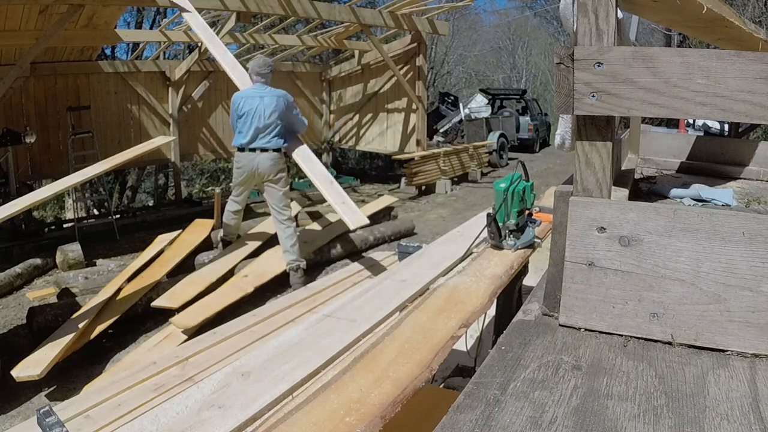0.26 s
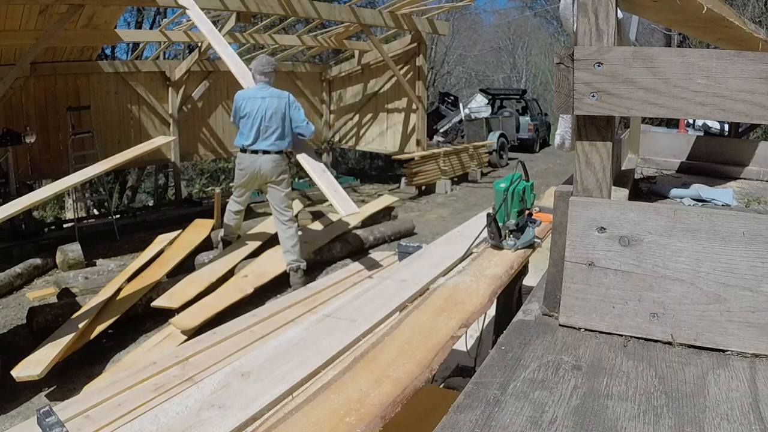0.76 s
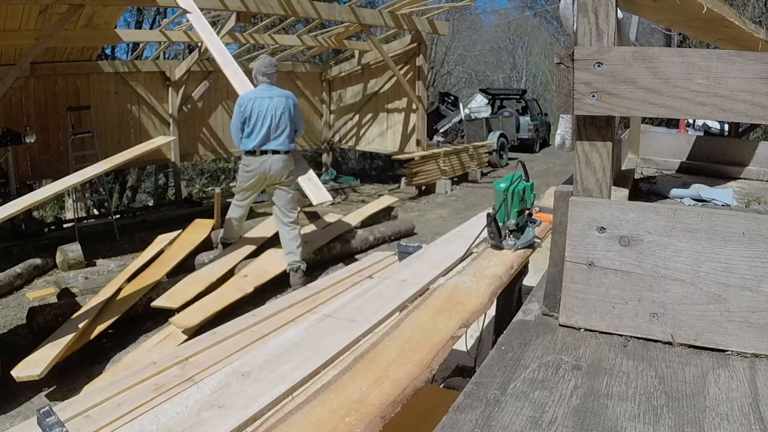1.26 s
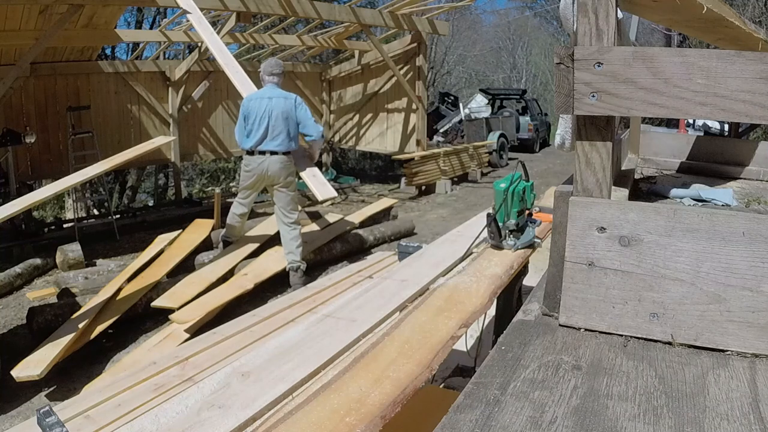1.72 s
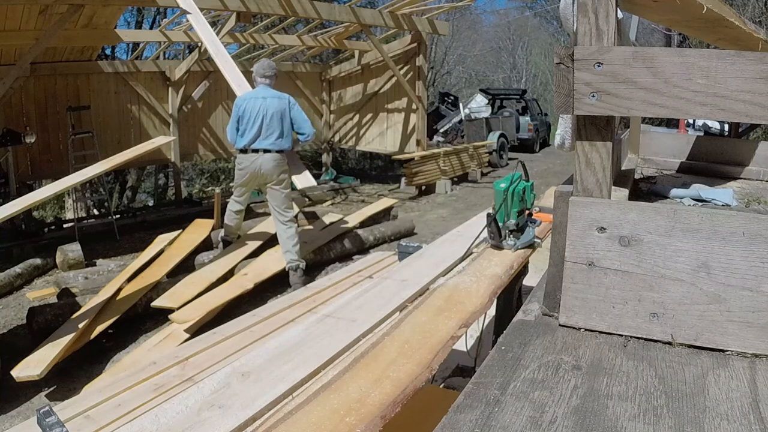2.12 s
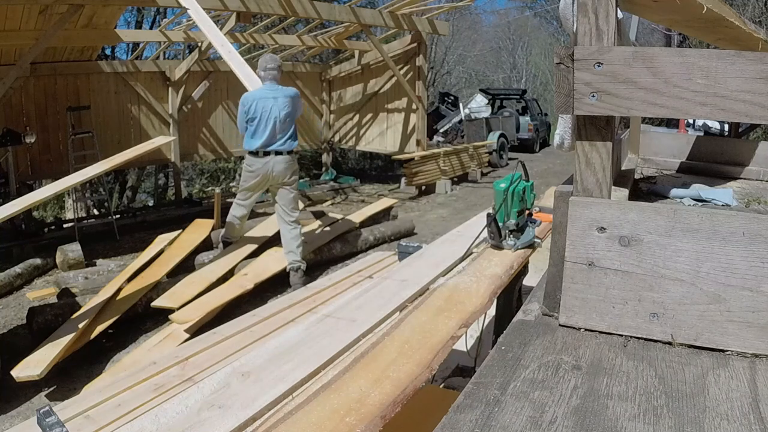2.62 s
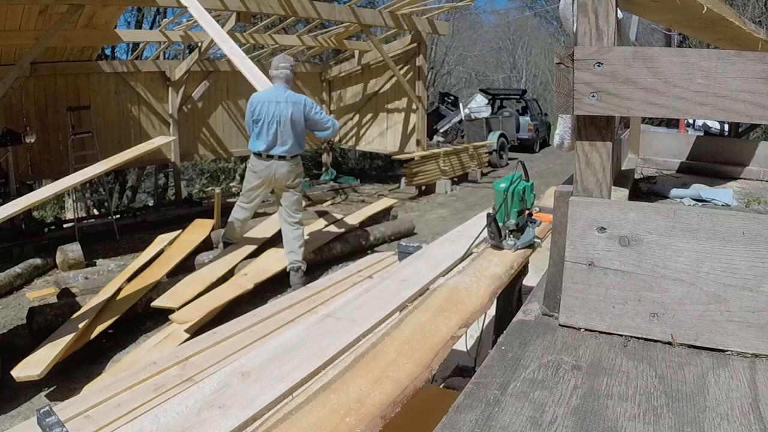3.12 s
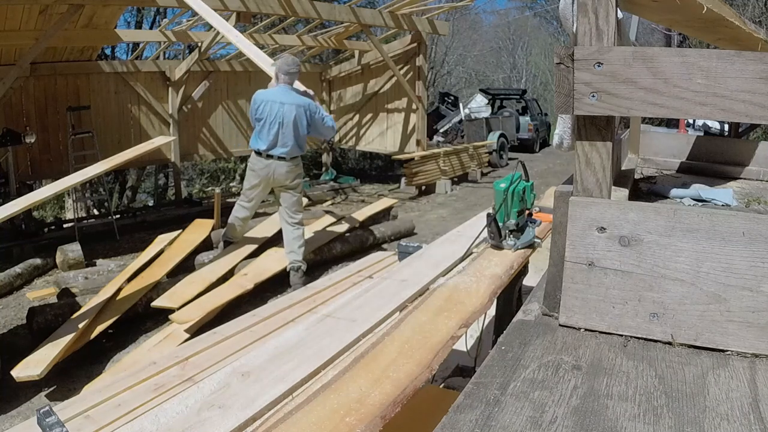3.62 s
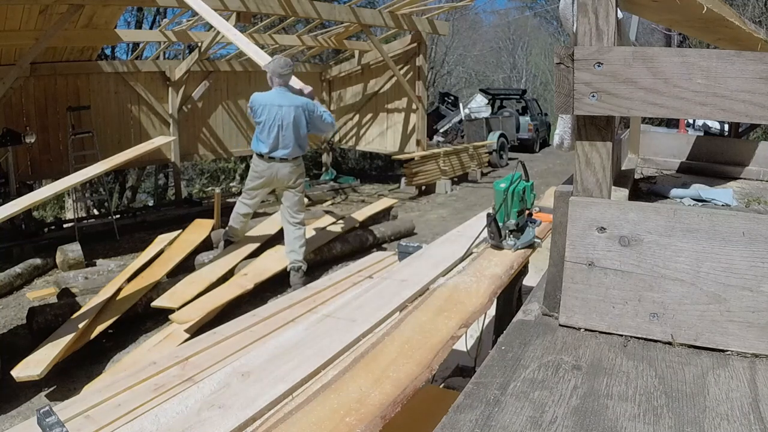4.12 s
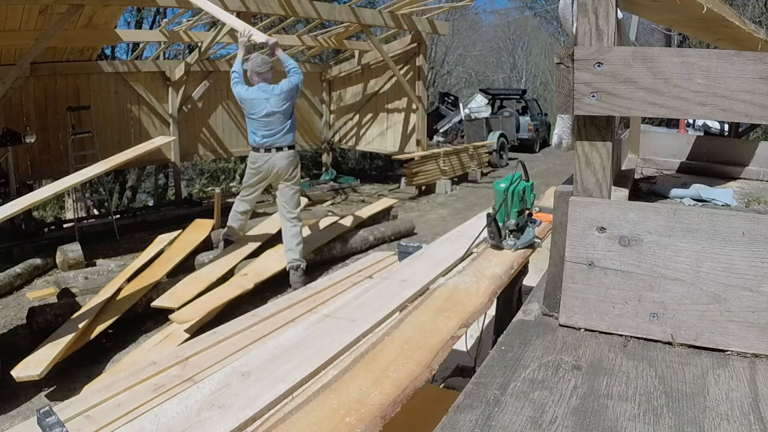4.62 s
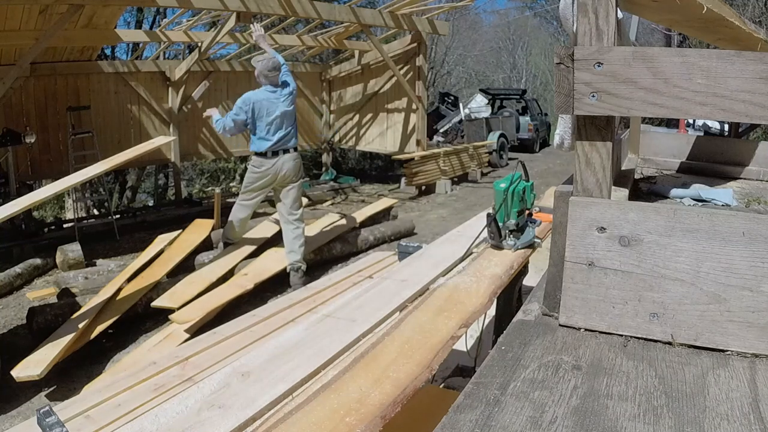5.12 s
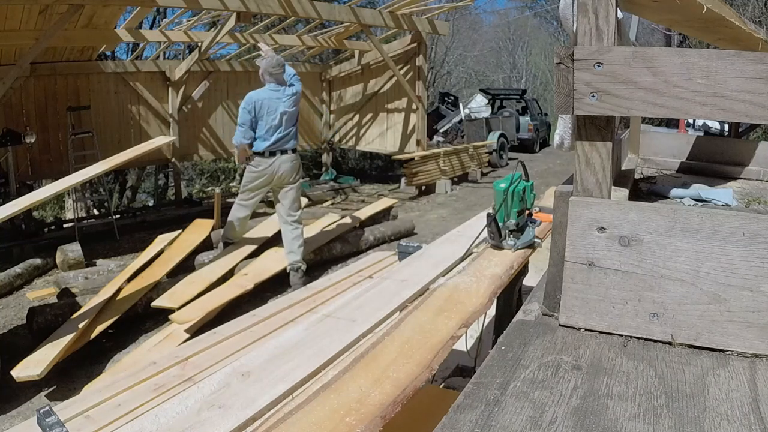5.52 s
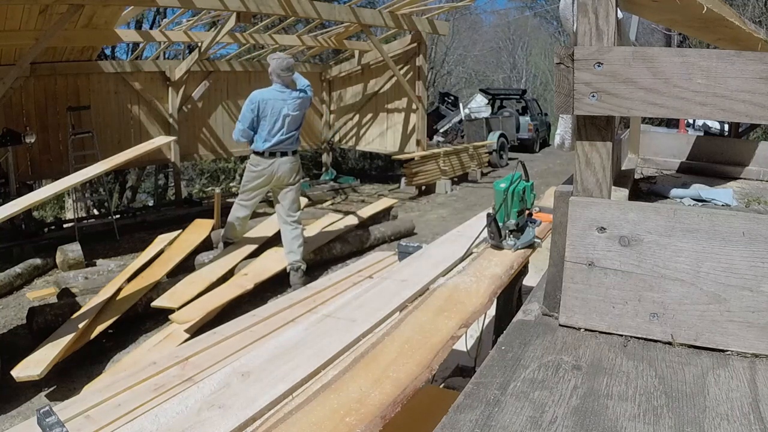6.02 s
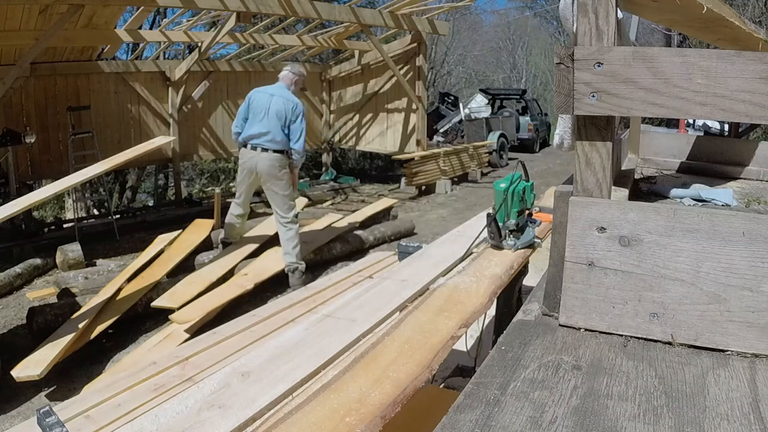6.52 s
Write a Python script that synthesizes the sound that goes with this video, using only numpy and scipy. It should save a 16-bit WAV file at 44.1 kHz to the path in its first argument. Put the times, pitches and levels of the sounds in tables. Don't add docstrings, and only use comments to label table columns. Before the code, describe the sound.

Dull hand-damped wood knocks come first, then dry stick-slip scraping with brief creaky, singing tones as a plank is pushed over a timber frame. After about five seconds it falls: a hard crack, low thud, hollow bounces and a fine splintery patter, then a second, smaller drop. Short scattered echoes come off posts and rafters. Steady quiet outdoor rumble from distant traffic and an idling engine, heard from a stationary microphone nearby.

```python
import sys
import numpy as np
from scipy import signal
from scipy.fft import rfft, irfft
from scipy.io import wavfile

SR = 44100
rng = np.random.default_rng(int(sys.argv[2]) if len(sys.argv) > 2 else 0)


def waveform_to_disk(signal):
    frames = np.transpose(np.atleast_2d(signal))
    scaled = np.clip(frames, -1, 1) * 32767
    samples = np.round(scaled).astype(np.int16)
    wavfile.write(sys.argv[1], SR, samples)


def volts(x):
    e = np.asarray(x, float) / 20
    return 10 ** e


N = 298116
TIME = np.arange(N) / SR

# t/s, peak level/dB, body (flat landing) re ring/dB, crack (hardness) re ring/dB
BLOWS = [(5.46, -16, -26, -7.5), (5.464, -6, 0.5, -14.5), (5.481, -24, 0, -11), (5.495, -17, -0.5, -19.5),
         (5.523, -19, 0, -16), (5.547, -24, 2, -35.5), (5.702, -16, 2, -14.5), (5.733, -20, 2.5, -18.5),
         (5.767, -24, 2, -30), (5.793, -19.5, -7, -43), (5.8, -13.5, -3.5, -57), (5.829, -19.5, 3.5, -49),
         (5.884, -12, -5, -64), (5.906, -27.5, -23, -53), (5.938, -20.5, -0.5, -59),
         (6.087, -23.5, -1, -39), (6.19, -47, 18, -17), (6.297, -56, 3, -17), (6.582, -15.5, -3, -18.5),
         (6.585, -16, -8, -18), (6.601, -17.5, 1.5, -28), (6.617, -17.5, 0, -22), (6.671, -10.5, -19, -34),
         (6.692, -18, 5, -36), (6.718, -27, -16, -32)]
# f/Hz, density level/dB
STRUCK_COLOUR = [(45, -15.5), (102, -7), (170, -9), (300, -4.5), (395, 1), (580, -11.5), (900, -2),
                 (1210, -5), (1500, -14), (2400, -13.5), (3100, -26.5), (4200, -33.5), (6550, -43),
                 (14000, -95.5)]


def rms_one(x):
    return x / np.sqrt(np.mean(x ** 2) + 1e-20)


def drift(rate):
    r = np.exp(-80 * np.pi * rate / SR)
    noise = rng.standard_normal(N // 40 + 2002)
    slow = rms_one(signal.lfilter([1], [1, -2 * r, r * r], noise)[2000:])
    return np.interp(np.arange(N) / 40, np.arange(len(slow)), slow)


def coloured(x, spectrum, size=8192):
    hz, db = np.transpose(spectrum)
    log_hz = np.log(np.arange(size // 2 + 1) * SR / size + 1)
    cepstrum = irfft(np.log(volts(np.interp(log_hz, np.log(hz), db))))
    cepstrum[1:size // 2] *= 2
    cepstrum[size // 2 + 1:] = 0
    response = irfft(np.exp(rfft(cepstrum))) * np.hanning(2 * size)[size:]
    return signal.oaconvolve(x, response)[:len(x)]


def band_pass(x, order, low_hz, high_hz):
    return signal.sosfilt(signal.butter(order, [low_hz, high_hz], "band", fs=SR, output="sos"), x)


def resonance(x, hz, t60):
    r, w = volts(-60 / (t60 * SR)), 2 * np.pi * hz / SR
    gain = 2 * np.sin(w) * np.sqrt(1 - r)
    return signal.lfilter([0, gain], [1, -2 * r * np.cos(w), r * r], x + 1e-18)


def grains(per_s, uneven_db):
    sizes = volts(uneven_db * np.minimum(rng.exponential(1, N), 4))
    signs = rng.choice([-1, 1], N)
    return rms_one(sizes * signs * (rng.random(N) < per_s / SR))


def wood(drives, spectrum, modes_db, t60, wander_db):
    registers_hz = [40, 550, 1500, 2800, 15000]
    board_hz = [64, 102, 117, 175, 225, 244, 278, 312, 359, 397, 438, 530, 672, 728, 800, 880, 940, 1022,
                1109, 1168, 1256, 1335, 1997, 2270, 2408, 2700, 4955, 5680]
    board_db = [12.5, 5, -1, 3, -5.5, 0, 5.5, 2, 4, -3, -6, -1.5, -15.5, -3.5, -4.5, -13.5, -7.5, -5, -8,
                -8.5, -6, -1, -8.5, -7, -14.5, -25, -18, -10.5]
    out, impulse = np.zeros(N), np.eye(1, SR // 2)[0]
    for drive, low, high in zip(drives, registers_hz, registers_hz[1:]):
        near = [(hz, db + modes_db) for hz, db in zip(board_hz, board_db) if low < hz < high]
        bed = np.sqrt(len(near) * SR / 2 / (high - low))
        body, answer = bed * drive, bed * impulse
        for hz, db in near:
            lasts = t60 * (hz / 300) ** -.45
            wander = wander_db * drift(7.4)
            body += resonance(drive * volts(db + wander), hz, lasts)
            answer += resonance(impulse * volts(db), hz, lasts)
        scale = np.linalg.norm(coloured(band_pass(answer, 3, low, high), spectrum))
        out += band_pass(body, 3, low, high) / scale
    return coloured(out, spectrum)


def traffic_wash():
    # f/Hz, density level/dB
    yard_colour = [(20, -10.5), (40, -1.5), (60, -10.5), (100, -5.5), (210, -7), (260, -10.5), (560, -15),
                   (750, -14), (1150, -15.5), (1500, -24), (2250, -22), (2600, -27.5), (6900, -37),
                   (15500, -55.5)]
    # t/s, level/dB
    yard_level = [(0, -45.5), (2.7, -46), (5.45, -45.5), (5.75, -47), (6.3, -46), (6.55, -46), (6.76, -46)]
    swell_db = np.interp(TIME, *np.transpose(yard_level)) + .5 * drift(18.0)
    return rms_one(coloured(rng.standard_normal(N), yard_colour)) * volts(swell_db)


def idling_engine():
    engine_hz, wander_width_hz, engine_db = 69, 3, -50
    turning = 2 * np.pi * np.cumsum(engine_hz + wander_width_hz / 2 * drift(3.95)) / SR
    drone = np.sqrt(2) * np.sin(turning) * volts(0.99 * drift(5.0))
    return volts(engine_db) * drone


def cloth_rustle():
    # t/s, half length/s, level/dB, low f/Hz, high f/Hz
    rustle = (.59, .022, -66, 5500, 10000)
    s, half, db, low, high = rustle
    cloth = rms_one(band_pass(grains(per_s=15000.0, uneven_db=10.0), 2, low, high))
    return volts(db) * cloth * np.exp(-((TIME - s) / half) ** 2)


def frame_echo(x):
    t60_s, dull_hz, echo_db = 0.23, 2500, -16
    age = np.arange(SR // 2) / SR
    returns = rng.standard_normal(len(age)) * (rng.random(len(age)) < .04) * (age > .008)
    dull = signal.sosfilt(signal.butter(1, dull_hz, fs=SR, output="sos"), returns)
    tail = dull * volts(-60 * age / t60_s) + 0.24 * returns * volts(-60 * age / (2.5 * t60_s))
    return volts(echo_db) * signal.fftconvolve(x, tail / np.sqrt(np.sum(tail ** 2)))[:N]


def thud():
    thud_hz, t60_s, thud_db = 50, .3, -22
    shake = np.zeros(N)
    for s, peak, body, *_ in BLOWS:
        age = np.clip(TIME - s, 0, None)
        decay = volts(peak + body + thud_db - 60 * age / t60_s)
        shake = np.hypot(shake, decay * (1 - np.exp(-age / 0.033)))
    return shake * rms_one(resonance(rng.standard_normal(N), thud_hz, 0.076))


def dust():
    # t/s, level/dB
    shaken = [
        (5.462, -47),
        (5.702, -53),
    ]
    swell_s, t60_s = 0.023, .3
    patter = rms_one(band_pass(grains(per_s=13000.0, uneven_db=2.5), 3, 4500, 8900))
    envelope = np.zeros(N)
    for s, db in shaken:
        age = np.clip(TIME - s, 0, None)
        envelope += volts(db - 60 * age / t60_s) * (1 - np.exp(-age / swell_s))
    return patter * envelope


def swaying_mode(s, rise_s, fall_s, hz, db):
    shake = 13.7 * (hz / 100) ** 0.27
    sway = np.sin(2 * np.pi * hz * TIME + 0.64 * drift(shake)) * volts(1.6 * drift(shake))
    swell = np.where(TIME < s, -((TIME - s) / rise_s) ** 2, -(TIME - s) / fall_s)
    return volts(db + 6) * sway * np.exp(swell)


def belly_rings():
    rings = [
        (0.387, 271.4, -34),
        (5.465, 1110, -15.5),
        (5.485, 397, -28),
        (5.704, 1159, -22),
        (5.741, 398, -21),
        (5.889, 1997, -30),
        (6.087, 1180, -27.5),
        (6.083, 1990, -36),
        (6.59, 1111, -28.5),
    ]
    out = np.zeros(N)
    for s, hz, db in rings:
        out += swaying_mode(s, 3.8 / hz, 0.024 * (300 / hz) ** 0.44, hz, db)
    return out


def singing_modes():
    sings = [(.55, 120, -44), (.98, 104.3, -41.5), (1.398, 125, -50.5), (2.1, 278, -45), (2.19, 1106, -36),
             (2.2, 2400, -36), (2.32, 871, -29.5), (2.44, 734, -33), (2.5, 277.7, -53), (2.58, 117, -40.5),
             (4.46, 360.5, -38.5), (4.64, 1098, -32.5), (4.79, 368.3, -26), (5.05, 114.4, -40),
             (6.25, 106, -47)]
    out = np.zeros(N)
    for s, hz, db in sings:
        rise_s, fall_s = 0.043 * (300 / hz) ** 0.51, 0.049 * (300 / hz) ** 0.49
        out += swaying_mode(s, rise_s, fall_s, hz, db)
    return out


def taps():
    # t/s, peak level/dB, body re ring/dB, edge re ring/dB
    contacts = [(0.383, -23.5, 1, -4), (1.284, -44, 6, -8), (2.022, -33, -9, -17), (4.637, -16, -27, -24),
                (5.459, -8, 2.5, -2.5), (5.4621, -5.5, -3, -2.5), (5.495, 0, -6, -23), (5.799, -11, 6, -21),
                (5.888, -12.5, 6, -5), (5.701, -16.5, -6, 0), (6.083, -14.5, -11, -9),
                (6.674, -1, -11, -9.5)]
    drives = np.zeros((4, N))
    for s, peak, body, edge in contacts:
        crack = 2.9 * edge - 13.5
        drives[:, round((s + .0008) * SR)] = volts(peak + 11.5 + np.array([body, 0, edge, crack]))
    ringing = wood(drives, STRUCK_COLOUR, modes_db=2.5, t60=0.027, wander_db=4.5)
    return signal.sosfilt(signal.butter(2, 190, "high", fs=SR, output="sos"), ringing)


def scrape():
    # t/s, rubbing pressure as level of its ring/dB
    strokes = [
        [(0.7, -60), (0.738, -52), (0.814, -51), (0.87, -41), (0.944, -38), (1.026, -34), (1.1, -42),
         (1.24, -62)],
        [(1.99, -59), (2.032, -42), (2.066, -42), (2.192, -29.5), (2.25, -25.5), (2.325, -26), (2.4, -35),
         (2.45, -28.5), (2.72, -62.5)],
        [(4.2, -53), (4.37, -43), (4.462, -33.5), (4.5, -37), (4.61, -26), (4.68, -27.5), (4.78, -24),
         (4.89, -25.5), (5.17, -63.5)],
    ]
    # body, edge, fibre hiss, each re ring/dB
    stroke_tone = [
        (-2.5, -8.5, -24.5),
        (-5.5, -7.5, -24.5),
        (-3.5, -10.5, -20.5),
    ]
    # f/Hz, density level/dB
    rubbed_colour = [(40, -57), (110, -5.5), (180, -14.5), (260, -6), (380, -3.5), (520, -11), (750, 0),
                     (1200, -2.5), (1600, -17.5), (2500, -14.5), (3300, -18.5), (4500, -23), (7000, -26.5),
                     (15000, -63.5)]
    # f/Hz, level/dB
    end_tilt = [(100, -2.5), (1400, 0.5), (1800, 2.5), (2700, -6.5), (4000, -4), (7000, -6), (10000, -2),
                (15000, 8)]
    full_db, last_shove_s = -28, 4.15
    levels = np.zeros((4, N))
    for stroke, (body, edge, hiss) in zip(strokes, stroke_tone):
        s, pressure = np.transpose(stroke)
        # level/dB, share of the pressure's swing in dB, lag/s (the heavy low modes answer late)
        registers = [(body, 0.73, 0.026), (0, 1, 0), (edge, 0.87, 0), (hiss, 0.67, 0)]
        for k, (db, follows, lag) in enumerate(registers):
            fade = np.clip(np.minimum(TIME - lag - s[0], s[-1] + lag - TIME) / 0.11, 0, 1)
            swing_db = np.interp(TIME - lag, s, pressure) - full_db
            levels[k] += fade * volts(full_db + db + follows * swing_db)
    force = grains(per_s=8000.0, uneven_db=3.0) * volts(1.0 * drift(24.0))
    rubbing = wood(force * levels, rubbed_colour, modes_db=-1.9, t60=0.23, wander_db=3.5)
    return np.where(TIME < last_shove_s, rubbing, coloured(rubbing, end_tilt))


def clatter(blows, contact, spectrum, t60_modes, swell_s):
    levels = np.zeros((4, N))
    edge_db, edge_share, t60_s, per_soft_db, per_dull_db = contact
    for s, peak, body, crack in blows:
        edge = edge_db + edge_share * crack
        t60 = t60_s - per_soft_db * peak - per_dull_db * crack
        start = round((s - .001) * SR)
        age = np.arange(min(SR, N - start)) / SR
        ring = peak - 4.0
        # level/dB, rise/s, share of t60, snap at contact
        registers = [(ring + body, swell_s, 1.3, .3), (ring, .002, .95, .6),
                     (ring + edge, .001, .85, 1.6), (ring + crack, .002, 1.2, 2.2)]
        for k, (db, rise_s, lasts, snap) in enumerate(registers):
            shape = volts(db - 60 * age / (t60 * lasts)) + volts(db) * snap * np.exp(-age / 0.0039)
            part = levels[k, start:start + SR]
            levels[k, start:start + SR] = np.hypot(part, shape * (1 - np.exp(-age / rise_s)))
    force = grains(per_s=12000.0, uneven_db=3.5) * volts(0.48 * drift(150.0))
    return wood(force * levels, spectrum, modes_db=-2.5, t60=t60_modes, wander_db=1.0)


def knocks_on_beam():
    # t/s, peak level/dB, body re ring/dB, crack re ring/dB
    knocks = [(0.342, -36.5, 1.5, -15.5), (0.382, -25, 3, -30), (0.403, -30, 4, -25),
              (0.425, -26.5, -1.5, -26), (0.447, -35, 0, -30), (0.48, -32, -3, -29), (0.5, -35, 5.5, -31),
              (0.54, -47, 0, -23), (0.734, -41.5, 2, -20), (0.937, -33, 6.5, -15), (0.966, -25, -10, -23),
              (1.285, -38.5, 1, -25), (1.324, -39.5, 1.5, -26), (2.021, -36.5, 3, -22),
              (2.961, -45.5, -1, -30), (4.03, -43.5, -9, -25)]
    beam_contact = (6.2, 0.77, .06, 0.0045, 0.0015)
    # f/Hz, density level/dB
    held_colour = [(40, -33), (110, -14.5), (190, -13.5), (300, -1.5), (600, -15.5), (1200, -16.5),
                   (1550, -25), (2300, -25.5), (4000, -37.5), (15000, -64)]
    return clatter(knocks, beam_contact, held_colour, t60_modes=0.096, swell_s=0.00053)


def blows_on_stack():
    stack_contact = (-2.06, 0.3, .06, .006, .003)
    return clatter(BLOWS, stack_contact, STRUCK_COLOUR, t60_modes=0.17, swell_s=0.0064)


def scene():
    yard = traffic_wash() + idling_engine() + cloth_rustle()
    board = belly_rings() + singing_modes() + taps() + knocks_on_beam() + scrape() + blows_on_stack()
    return (yard + frame_echo(board) + thud() + dust() + board)[None]


def band_limit(x):
    return signal.sosfilt(signal.butter(12, 15780, fs=SR, output="sos"), x)


def record(dry):
    top = .985
    cut = signal.sosfilt(signal.cheby2(8, 40, 15780, fs=SR, output="sos"), dry)
    ceiling = (1 + np.abs(cut / top) ** 12) ** (1 / 12)
    return band_limit(cut / ceiling)


dry = scene()
out = record(dry)
waveform_to_disk(out)
```